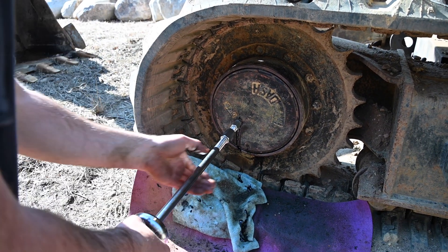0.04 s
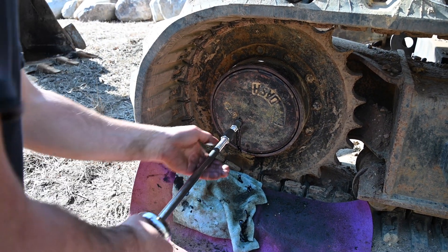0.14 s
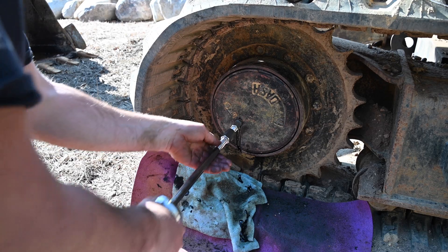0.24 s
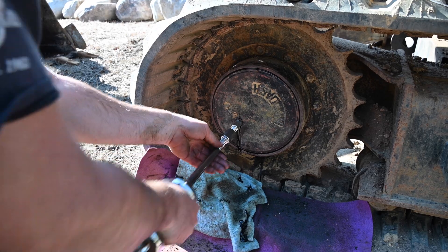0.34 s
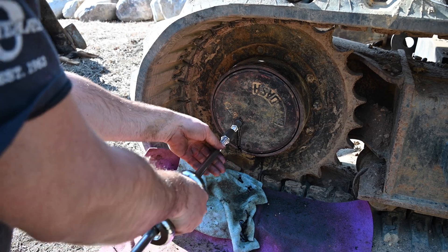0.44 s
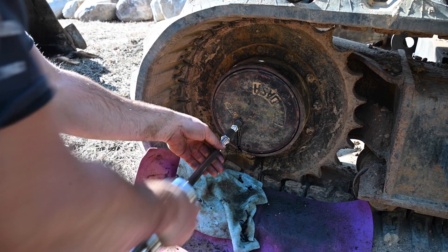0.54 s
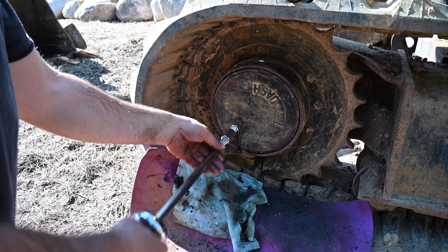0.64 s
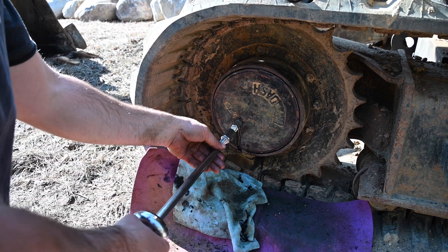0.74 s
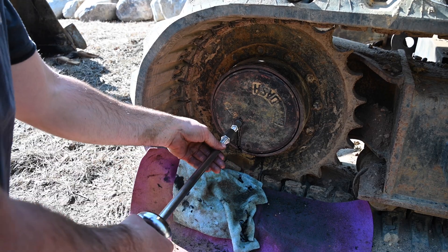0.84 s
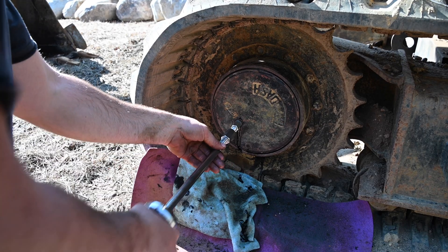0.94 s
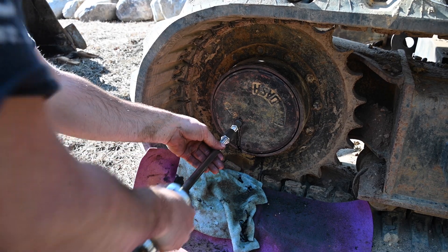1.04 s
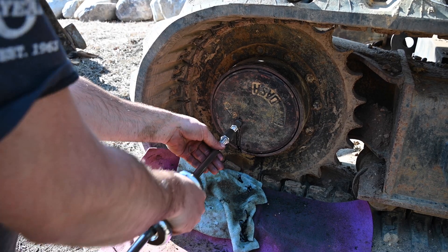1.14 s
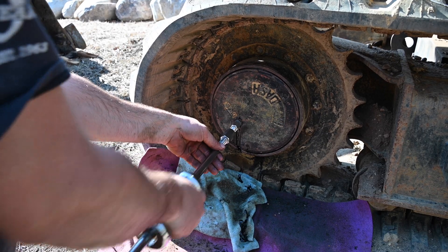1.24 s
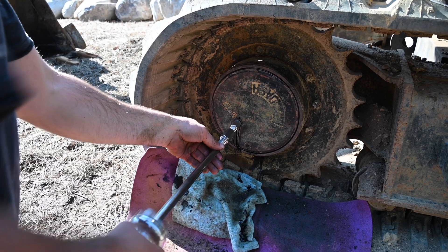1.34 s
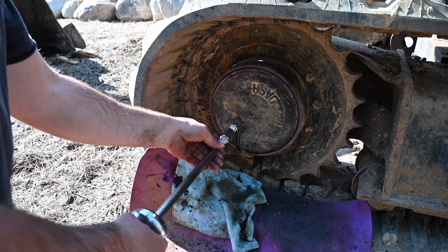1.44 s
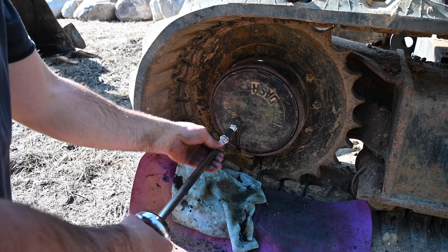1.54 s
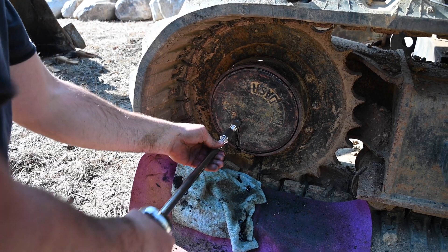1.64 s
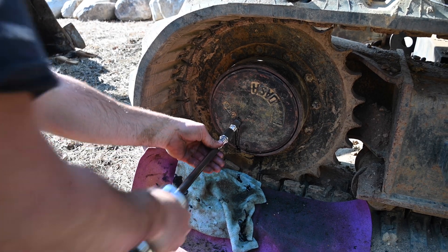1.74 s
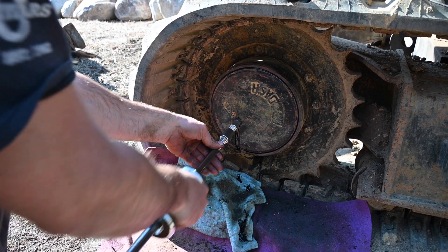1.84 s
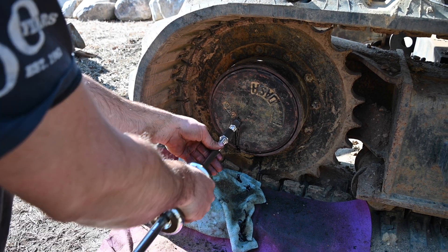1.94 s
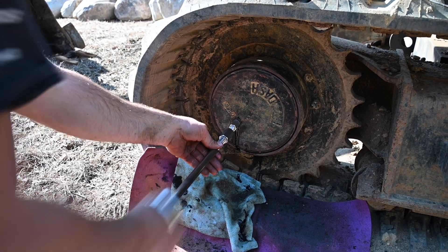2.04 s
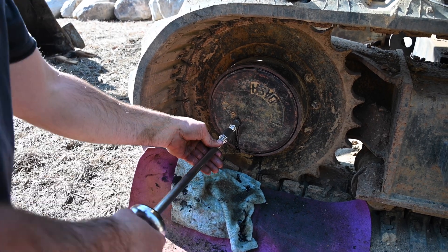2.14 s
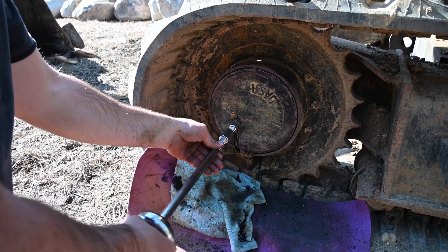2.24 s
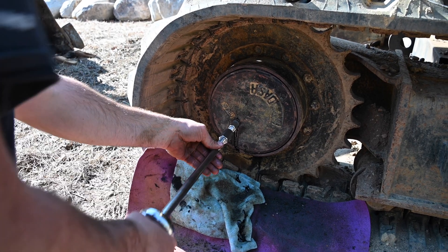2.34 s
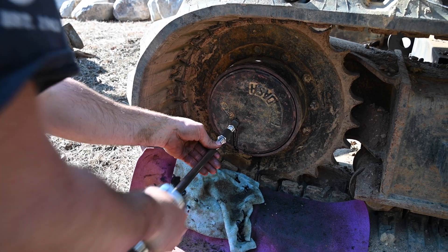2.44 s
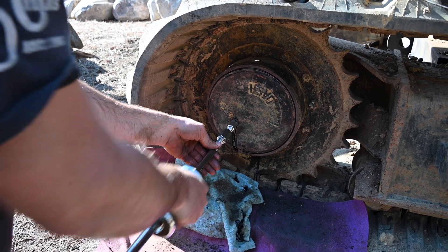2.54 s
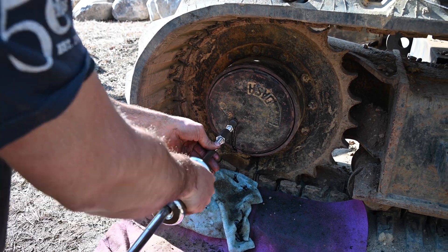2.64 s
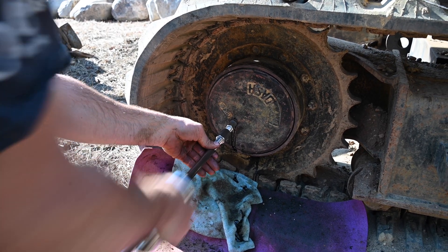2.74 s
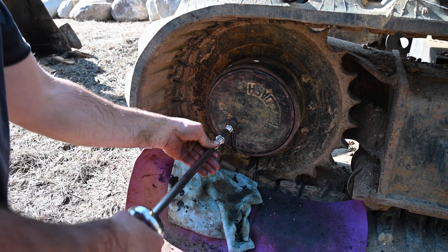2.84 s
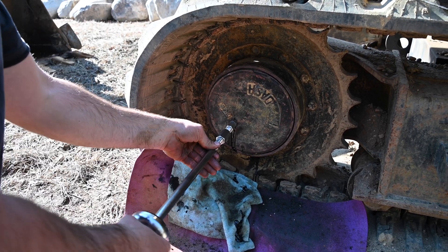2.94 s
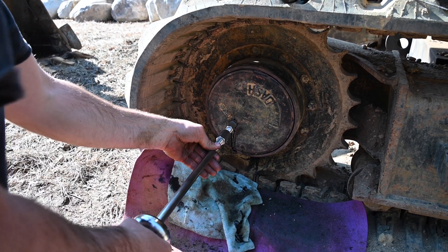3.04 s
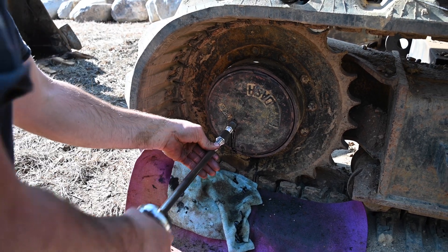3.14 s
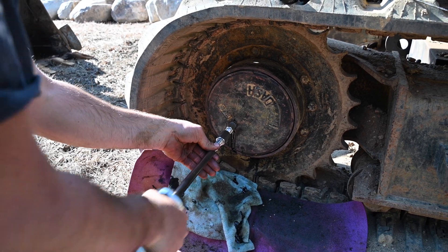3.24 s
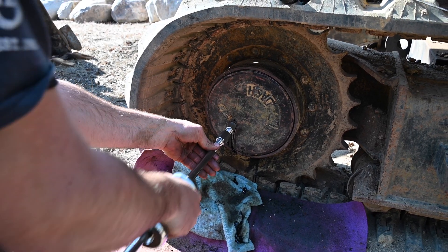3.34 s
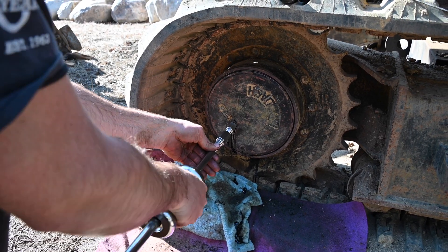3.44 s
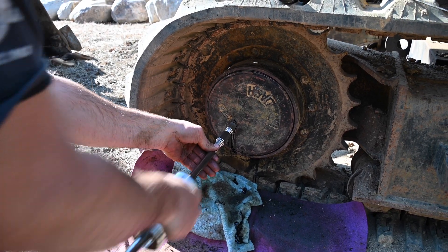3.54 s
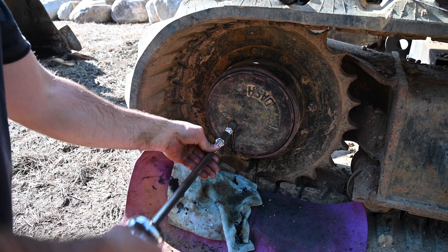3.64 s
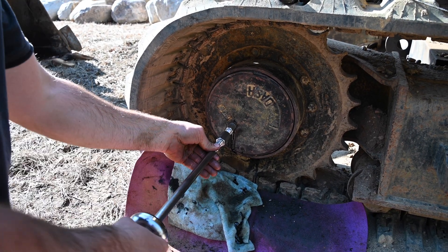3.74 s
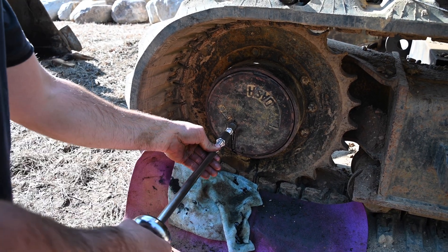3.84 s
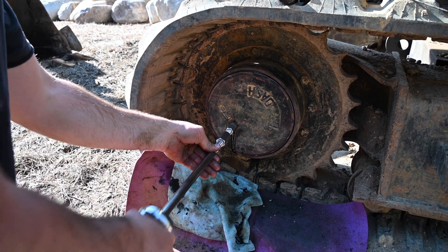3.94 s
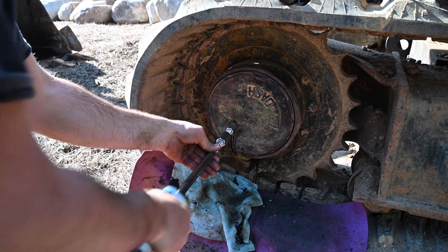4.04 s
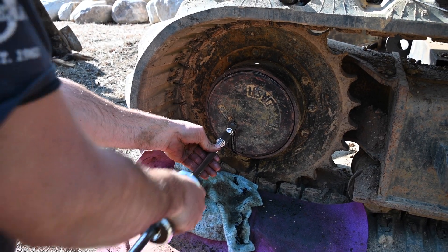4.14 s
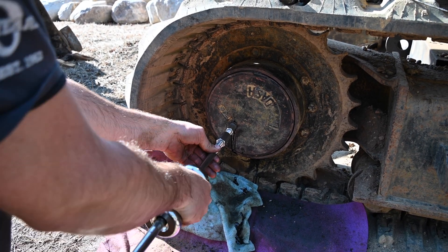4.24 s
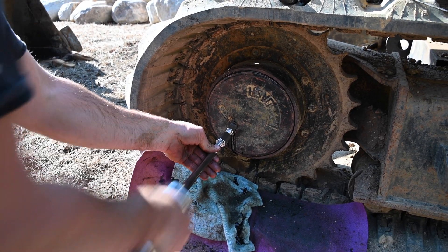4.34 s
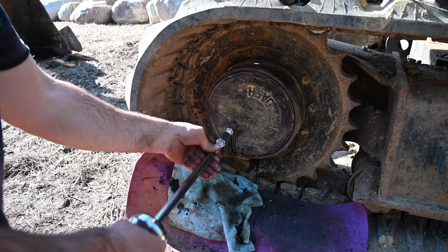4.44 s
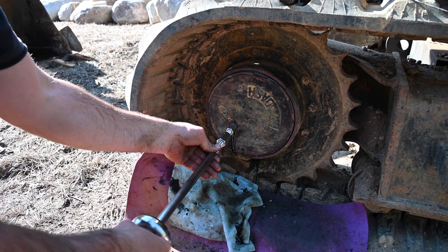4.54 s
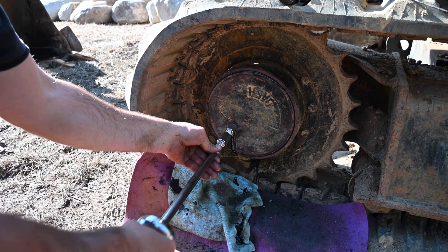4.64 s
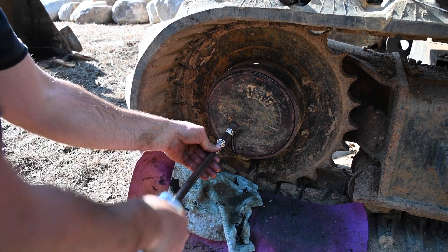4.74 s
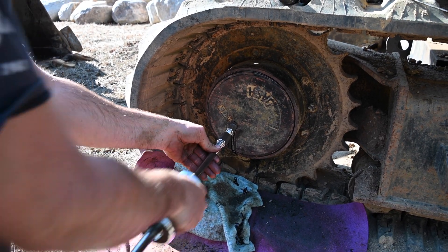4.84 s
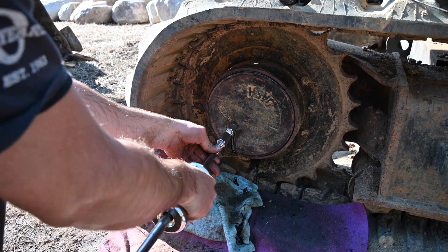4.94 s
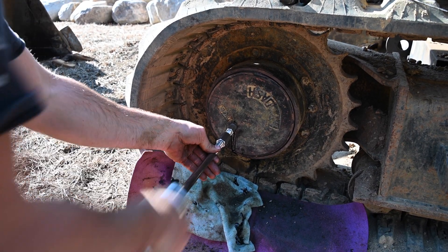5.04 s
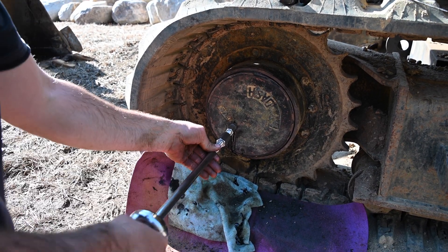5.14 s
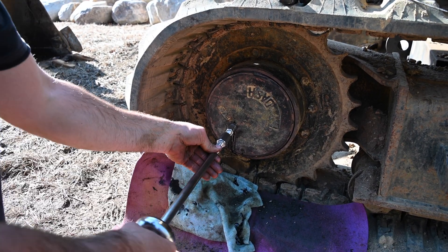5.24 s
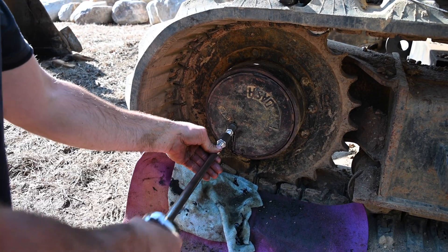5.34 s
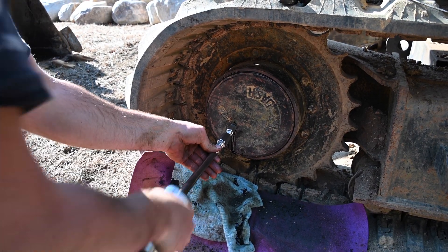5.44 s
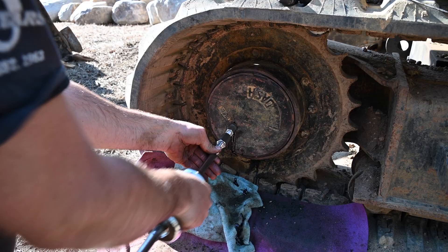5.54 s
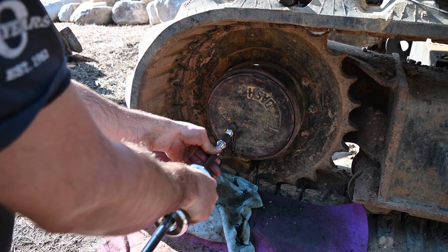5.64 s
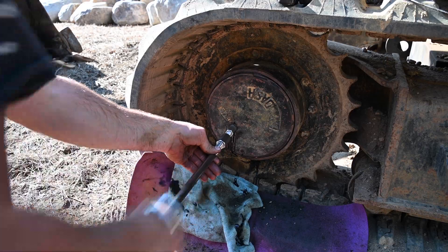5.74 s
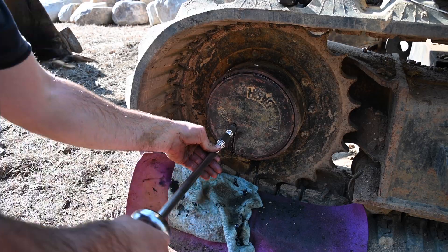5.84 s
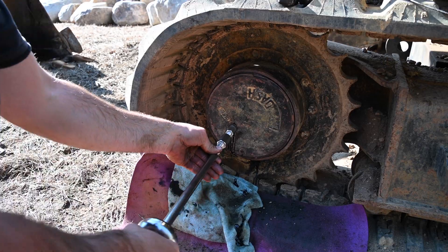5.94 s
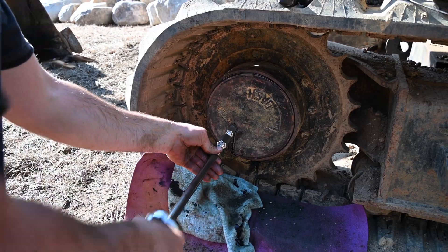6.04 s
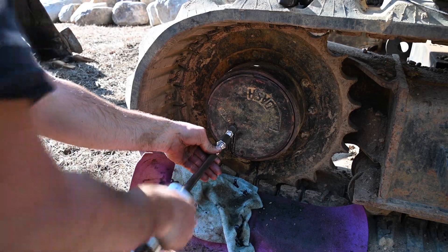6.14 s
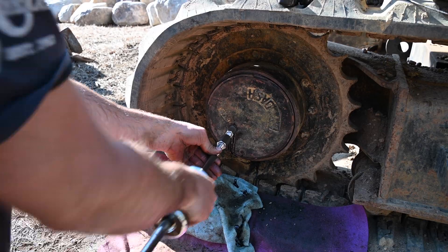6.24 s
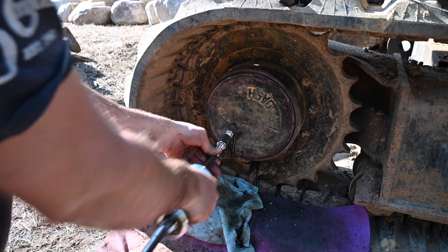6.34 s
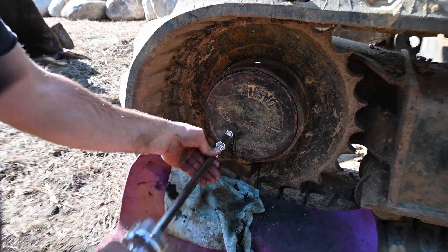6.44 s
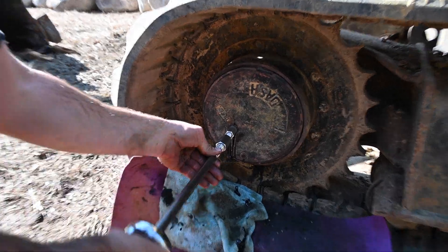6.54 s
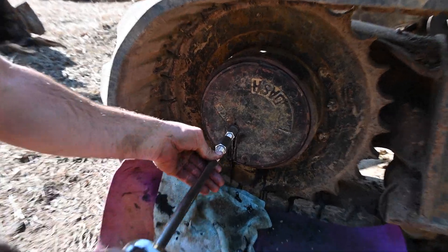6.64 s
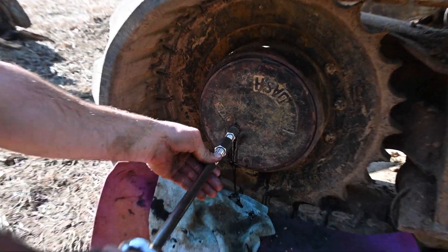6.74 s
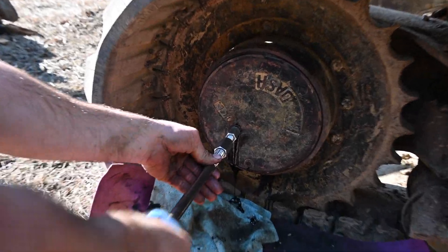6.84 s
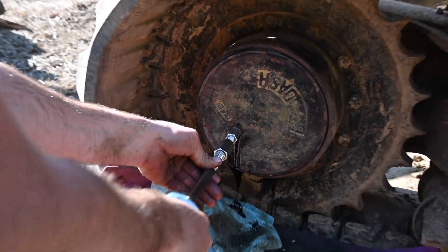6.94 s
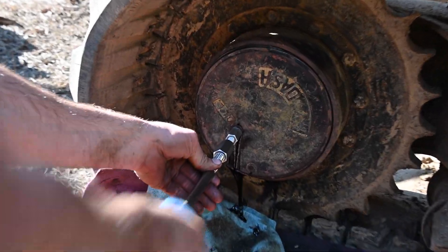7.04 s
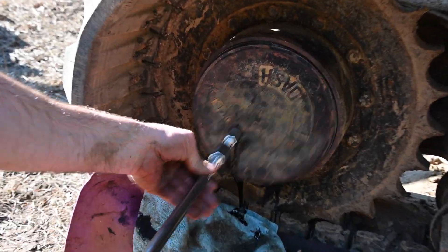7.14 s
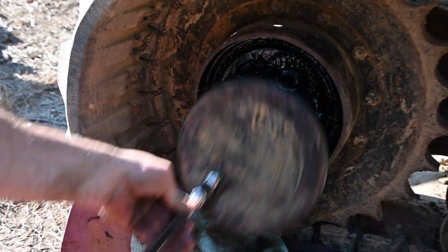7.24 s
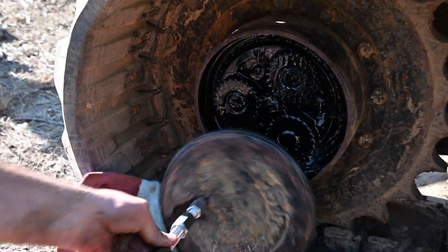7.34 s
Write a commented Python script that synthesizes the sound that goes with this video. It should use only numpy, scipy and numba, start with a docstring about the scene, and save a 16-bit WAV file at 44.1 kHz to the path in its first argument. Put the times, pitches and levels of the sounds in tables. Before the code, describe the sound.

Outdoors, over the low drone of distant machinery, a slide hammer strikes ten hard, evenly paced steel blows close by. Between them the weight rasps along its rod and rattles lightly. Puffs of wind thump the microphone early on, and a sleeve hisses across it near the middle. The final blow follows a short rising zip and frees a metal hub cover, which clangs hollowly.

```python
"""Far machinery drones outdoors and wind bumps the microphone as a steel weight scrapes along its rod.
It is a slide hammer, pulled ten times to draw a steel cover off the drive hub of a tracked machine.
The weight slides forward, clinks at the front stop and slams back into the rear one, ringing rod, cover
and hub; a limiter ducks under the blows. A sleeve brushes by midway. The last pull zips over the rod's
tool marks, and its blow knocks the cover free with a hollow clang."""
import sys
import numpy as np
from scipy import signal
from scipy.fft import rfft, irfft, next_fast_len
from scipy.io import wavfile
from scipy.ndimage import uniform_filter1d, map_coordinates
from numba import njit

SR = 44100
rng = np.random.default_rng(int(sys.argv[2]) if len(sys.argv) > 2 else 0)


def unload_audio(sound):
    """Save the sound as a 16-bit wav file, at the path given as the first command line argument."""
    columns = np.transpose(np.atleast_2d(sound))
    # keep every value between -1 and 1, then stretch to whole-number steps
    steps = np.round(np.clip(columns, -1, 1) * 32767)
    wavfile.write(sys.argv[1], SR, steps.astype(np.int16))


N = 326643

# Stereo image of close sounds and of diffuse ones: freq_hz, left_right_correlation
CLOSE_IMAGE = [(100, 1), (300, 0.99), (800, 0.87), (1500, 0.88), (4000, 0.38), (8000, 0.12), (14000, -0.45)]
DIFFUSE_IMAGE = [(130, 0.92), (300, 0.96), (640, 0.88), (1400, 0.47), (3000, 0.15), (10000, 0.11)]
# Spectrum of the far machinery: freq_hz, level_db
DRONE_SPECTRUM = [(15, -28.5), (25, 4), (101, 7), (224, 1.5), (529, -3), (790, -1), (1240, -7.5),
                  (1540, -5.5), (1670, -8.5), (3010, -11), (3540, -17.5), (3830, -15.5), (5420, -17.5),
                  (8780, -23.5), (15000, -29)]
# Its steady tones: pitch_hz, level_db
HUM_TONES = [(108, -64), (155, -56.5), (748, -62.5)]
# Resonances of the rod under the weight: pitch_hz, width_hz, level_db
ROD_MODES = [(1028, 240, -2), (1466, 126, -2.5), (1775, 48, 3.5), (2064, 360, -1.5), (2291, 128, 3),
             (2738, 160, -2.5), (3424, 130, -6), (4047, 94, 1.5), (4640, 160, -14.5), (5190, 62, 2.5),
             (5500, 140, -4), (6435, 66, -2), (8260, 180, -10.5), (10460, 140, -11.5), (12050, 230, -15)]
# Forward strokes of the weight: top_speed_s, length_s, scrape_db, sing_db
PUSH_STROKES = [(0.377, 0.24, -45.5, -62), (1.08, 0.17, -41, -45.5), (1.83, 0.23, -39, -46.5),
                (2.563, .26, -43.5, -46), (3.304, 0.21, -39.5, -66), (4.136, 0.22, -43, -60),
                (4.89, 0.23, -39.5, -61), (5.576, .28, -42, -48), (6.3, 0.31, -42, -52),
                (7.006, 0.19, -45.5, -61)]
# Puffs of wind: peak_s, length_s, level_db
WIND_PUFFS = [(0.37, 0.12, -34), (0.476, 0.023, -27.5), (1.76, 0.056, -22.5), (1.87, 0.09, -18),
              (2.01, .05, -28.5), (2.401, 0.023, -20.5), (2.485, 0.07, -31), (7.19, .08, -33)]
# Their low rumble: freq_hz, level_db
WIND_SPECTRUM = [(15, -54), (25, -17), (59, 4), (108, 3), (260, -8.5), (487, -27.5), (700, -38), (910, -73),
                 (1540, -120)]
# Light contacts of weight and rod: start_s, level_db, body_db, treble_db
CLINK_HITS = [(0.599, -15.5, -6.5, 0), (0.638, -26, 13.5, 5), (0.68, -22, -10, 5), (1.401, -19.5, -1, -8),
              (2.158, -9, -13, 9), (2.547, -24.5, -9, -15), (2.691, -20, -4, -21), (2.768, -2.5, -26, 4),
              (2.88, -8, -9, 11), (3.269, -24, 0, 20), (3.342, -18.5, -3, -2), (3.353, -21.5, -15, -7),
              (3.718, -16, -10, 4), (4.169, -30, 26, -12), (4.456, -25, 4, 10), (4.483, -15, 2, 4),
              (4.997, -23, 6.5, -11), (5.05, -9, -15.5, -1.5), (5.064, -17.5, -2.5, -1),
              (5.576, -9.5, -5, -7), (5.727, -8.5, -20.5, 8), (6.427, -21, -1, -15), (6.521, -17, -4, 3),
              (6.771, -11, -5.5, 11.5), (6.912, -18.5, -2, 11), (7.219, -15, 5, 3)]
# The tick of such a contact: freq_hz, level_db
CLINK_SPECTRUM = [(150, -38), (250, 0), (1200, -5), (1470, 7), (1980, -34), (2320, -1.5), (4410, -3.5),
                  (5350, -2), (5930, -10), (6590, -10.5), (16000, -35.5)]
# Blows on the rear stop and the pull into each: start_s, level_db, thump_db, clang_db, pull_s, scrape_db
BLOW_HITS = [(0.719, -0.5, -0.5, 1.5, .12, -32), (1.447, -0.5, 1.5, -7, 0.1, -31.5),
             (2.170, -3.5, 0.5, -0.5, 0.098, -27.5), (2.896, -5.5, 2.5, -1, 0.082, -32.5),
             (3.726, -2.5, -2.5, 0.5, 0.13, -27.5), (4.498, -6.5, -3.5, 3, .15, -28),
             (5.187, -7, -1, 2.5, 0.12, -27.5), (5.873, -8, 2, 4, 0.086, -27.5),
             (6.552, -1, 4.5, 4.5, .17, -28), (7.234, -2.5, -3, 5.5, .13, -26.5)]
# The noisy crash of a blow: freq_hz, level_db
CRASH_SPECTRUM = [(35, -28), (60, -15.5), (268, 2.5), (579, -14.5), (785, -2), (1220, -9.5), (1820, -4),
                  (2250, -16), (2580, -1.5), (3270, -9), (5330, -5), (6000, -11), (10800, -12.5),
                  (16000, -16.5)]
# Rod, cover and hub ringing together: pitch_hz, level_db, t60_s
STEEL_MODES = [(242, -10, 0.034), (288.5, -3, 0.098), (724.5, -0.5, 0.067), (812, -1.5, 0.088),
               (1009, -1.5, 0.045), (1270, -11, 0.05), (1495, -5, 0.084), (1593, -8, 0.086),
               (1785, 2, 0.063), (2033, -6.5, 0.089), (2460, -10, 0.087), (2670, -6.5, 0.079),
               (3680, -12, 0.06), (4324, -1, 0.037), (4440, -6, 0.074), (4907, -1, 0.048), (5380, 7, 0.034),
               (8200, -4, 0.068), (10600, -2.5, 0.082)]
# Hiss of brushing cloth: freq_hz, level_db
CLOTH_SPECTRUM = [(500, -31), (1500, -5), (3500, -1.5), (4500, -6.5), (7000, 0.5), (9000, -3), (11000, -1),
                  (15500, -11)]
# The cover knocks in its seat and comes free: start_s, level_db, hollow_db
COVER_KNOCKS = [(6.914, -15, -3), (7.243, 1, 9), (7.251, -5, 4), (7.266, -4, 0.5)]
# Ring of the loose cover: pitch_hz, level_db, t60_s
COVER_MODES = [(394, -4.5, 0.15), (755, -7, 0.1), (1007, -5.5, 0.1), (1480, 1.5, 0.093), (1760, -5, 0.085),
               (5210, 15, 0.028), (7100, -6, 0.087)]
# The zip of the last pull: peak_s, length_s, level_db
ZIP_SWELL = [(7.19, 0.12, -35)]
# The hammer's balance at the two microphone ports: freq_hz, left_minus_right_db
HAMMER_PAN = [(150, 4), (400, -1.5), (700, 3.5), (1300, -1), (2300, -4), (4400, -1), (8000, 1), (15000, .5)]
# Decay of the yard's tail: freq_hz, t60_s
YARD_DECAY = [(150, 0.31), (1500, 0.53), (5000, 0.52), (14000, 0.5)]
# Colour of that tail: freq_hz, gain_db
YARD_EQ = [(100, 11), (300, 14.5), (1000, 0.5), (3000, 6.5), (12000, -2.5)]


def amp(db):
    """Decibels to gain."""
    return 10 ** (np.asarray(db) / 20)


def unit(x):
    """Scale to an rms of 1."""
    return x / np.sqrt(np.mean(x ** 2) + 1e-20)


def along(points, hz):
    """Read (freq_hz, value) points on a log frequency axis."""
    freqs, values = np.transpose(points)
    return np.interp(np.log(hz + 1), np.log(freqs + 1), values)


def eq(points):
    """An EQ curve, gain by frequency, through (freq_hz, level_db) points."""
    return lambda hz: amp(along(points, hz))


def wobble(rate_hz):
    """A smooth random drift with rate_hz knots a second."""
    knots = rng.standard_normal(int(N * rate_hz / SR) + 4)
    return map_coordinates(knots, [np.arange(N) * rate_hz / SR])


def filtered(x, response):
    """Play x through a frequency response."""
    n = x.shape[-1]
    padded = next_fast_len(n + n // 8)
    return irfft(rfft(x, padded) * response(np.fft.rfftfreq(padded, 1 / SR)), padded)[..., :n]


def noise(colour, image, size=N):
    """Stereo noise of rms 1 with a given colour and stereo image."""
    def mid_side(hz):
        angle = np.arccos(np.clip(along(image, hz), -1, 1)) / 2
        return colour(hz) * np.array([np.cos(angle), np.sin(angle)])
    mid, side = filtered(rng.standard_normal((2, size)), mid_side)
    return unit(np.array([mid + side, mid - side]))


def swells(rows, rise, power=1.94):
    """Envelope of (peak_s, length_s, level_db) swells, 10 dB down at each end; rise is a share of each."""
    t, gain = np.arange(N) / SR, np.zeros(N)
    for peak_s, length_s, db in rows:
        away = np.abs(t - peak_s) / (length_s * np.where(t < peak_s, rise, 1 - rise))
        gain += amp(db - 10 * np.minimum(away ** power, 10))
    return gain


def shimmer(x, depth_db):
    """Each band swells and sinks on its own within a few hundredths of a second."""
    bands = signal.stft(x, nperseg=512)[2]
    drift = uniform_filter1d(rng.standard_normal(bands.shape[1:]), size=4, axis=0)
    drift = uniform_filter1d(drift, size=7, axis=1)
    return signal.istft(bands * amp(depth_db * unit(drift)), nperseg=512)[1][:, :N]


def add(track, start_s, sound):
    """Mix a sound into a track."""
    part = track[:, round(start_s * SR):][:, :sound.shape[1]]
    part += sound[:, :part.shape[1]]


def drone_and_whine(drone_db=-39, whine_db=-55, whine_hz=15704):
    """The bed: far machinery drones and hums, and the microphone's electronics whine faintly."""
    t = np.arange(N) / SR
    drone = amp(drone_db + 1.66 * wobble(9.4)) * noise(eq(DRONE_SPECTRUM), DIFFUSE_IMAGE)
    hum = sum(amp(db + 2.3 * wobble(3.7)) * np.sin(2 * np.pi * hz * t + 1.2 * wobble(17))
              for hz, db in HUM_TONES)
    whine = amp(whine_db + 1.2 * wobble(3)) * np.sin(2 * np.pi * whine_hz * t) * amp([[-1.5], [1.5]])
    return drone + np.sqrt(2) * (hum + whine)


def rod_response(hz):
    """The rod as a bank of resonators of alternating polarity."""
    return sum((-1) ** k * amp(db) * 1j * hz * width / (pitch ** 2 - hz ** 2 + 1j * hz * width)
               for k, (pitch, width, db) in enumerate(ROD_MODES))


def rod_scrape(grain_db=4, chatter_db=3, grit_per_s=130, grit_db=-4, reflection=0.48):
    """Roughness and grit excite the rod; waves reflected at the moving weight sweep its colour."""
    rough = unit(amp(grain_db * wobble(1100) + chatter_db * wobble(70)))
    grit = unit((rng.random(N) < grit_per_s / SR) * 1.)
    friction = (rough + amp(grit_db) * grit) * noise(eq([(1000, 0.5), (10000, -2)]), CLOSE_IMAGE)
    direct = shimmer(filtered(friction, rod_response), depth_db=5)
    n = np.arange(N)
    stroke_edges = np.r_[0, np.transpose(BLOW_HITS)[0]] * SR
    strokes = np.interp(n, stroke_edges, np.arange(len(stroke_edges)))
    position = np.sin(np.pi * strokes) ** 2  # 0 at the rear stop, 1 at the front
    delay_s = 0.000507 + 0.000724 * position
    reflected = np.array([np.interp(n - delay_s * SR, n, side) for side in direct])
    return unit(direct + reflection * reflected)


def pushes(scrape, push_db=2, unsteady_db=2, sing_db=-3, sing_hz=1794, width_hz=24, sing_s=0.47):
    """The weight slides forward, speeds up and coasts; the rod's bending note sings a little longer."""
    glide = swells([row[:3] for row in PUSH_STROKES], rise=0.36, power=2.04)
    slide = amp(push_db + unsteady_db * wobble(35)) * glide * scrape
    note = noise(lambda hz: 1 / (1 + ((hz - sing_hz) / width_hz) ** 2), CLOSE_IMAGE)
    sustain = swells([(peak_s, sing_s, db) for peak_s, _, _, db in PUSH_STROKES], rise=0.15)
    return slide + amp(sing_db) * note * sustain


def wind(buffet_db=-2, lumpy_db=3):
    """Lumps of moving air bump the microphone ports, mostly the left one."""
    gusts = swells(WIND_PUFFS, rise=0.46) * amp(buffet_db + lumpy_db * wobble(200))
    return gusts * noise(eq(WIND_SPECTRUM), image=[(100, 0.067)]) * amp([[3], [-5]])


def ring(t, modes, tint, scatter_db, detune, spread_hz=5000):
    """Struck steel rings in decaying modes, varied per hit; short waves reach the ports out of step."""
    hz, db, t60_s = np.transpose(modes)[:, :, None]
    strength, skew, shift = rng.standard_normal((3, len(modes), 1))
    envelope = tint(hz) * amp(db + scatter_db * strength - 60 * t / t60_s)
    phase = 2 * np.pi * hz * (1 + detune * shift) * t + rng.uniform(0, 2 * np.pi, hz.shape)
    offset = skew * hz / spread_hz
    return np.array([np.sum(envelope * np.sin(phase + port * offset), 0) for port in (-1, 1)])


def clink(t, db, body_db, treble_db, t60_s, ring_db, snap_t60_s=0.0077):
    """A light contact ticks and rings the rod, tuned a little differently each time."""
    tint = eq([(700, body_db), (4000, 0), (9000, treble_db)])
    decay = amp(-60 * t / t60_s) + amp(-60 * t / snap_t60_s)
    tick = noise(lambda hz: eq(CLINK_SPECTRUM)(hz) * tint(hz), CLOSE_IMAGE, len(t)) * decay
    modes = [(hz, mode_db, 0.06 * (2000 / hz) ** 0.36) for hz, _, mode_db in ROD_MODES]
    tone = amp(ring_db) * ring(t, modes, tint, scatter_db=3.5, detune=0.0302)
    attack_s = 0.00093 * amp(-27 - db)  # a glancing touch starts softly
    return amp(db) * (tick + tone) * (1 - np.exp(-t / attack_s))


def clinks(gain_db=-10):
    """The weight rattles on the rod and meets the front stop."""
    out, t = np.zeros((2, N)), np.arange(SR // 6) / SR
    for start_s, db, body_db, treble_db in CLINK_HITS:
        add(out, start_s, amp(gain_db) * clink(t, db, body_db, treble_db, t60_s=0.053, ring_db=-3))
    return out


def pulls(scrape, hiss_db=-5, speed_power=1.85):
    """The weight is yanked back, gaining speed steadily: its scrape swells and stops dead at the blow."""
    t, envelope = np.arange(N) / SR, np.zeros(N)
    for blow_s, *_, pull_s, scrape_db in BLOW_HITS:
        speed = (t < blow_s) * np.clip(1 - (blow_s - t) / pull_s, 0, 1)
        envelope += amp(scrape_db) * speed ** speed_power
    hiss_colour = eq([(300, -7), (1200, -1.5), (2300, -7), (3300, -1),
                      (4300, 0), (5500, 0), (7500, -6.5), (15000, -13)])
    return envelope * (scrape + amp(hiss_db) * noise(hiss_colour, CLOSE_IMAGE))


def blows(gain_db=11, ring_db=-13, crack_db=-6, crack_t60_s=0.0077, bloom_s=0.0029, contact_s=0.0053):
    """Steel on steel: a crack, then the shock runs up the rod and sets cover and hub crashing."""
    out, t = np.zeros((2, N)), np.arange(SR // 5) / SR
    crack_colour = eq([(500, 0), (4000, -18), (10000, 13), (15000, 4.5)])
    for count, (start_s, db, thump_db, clang_db, _, _) in enumerate(BLOW_HITS):
        t60_s = 0.032 + 0.0026 * count  # the crash lengthens as the cover works loose
        tint = eq([(300, thump_db), (500, 0), (900, clang_db), (2000, 0)])
        crash = noise(lambda hz: eq(CRASH_SPECTRUM)(hz) * tint(hz), CLOSE_IMAGE, len(t))
        crash *= amp(-60 * np.maximum(t - contact_s, 0) / t60_s)
        crack = noise(crack_colour, CLOSE_IMAGE, len(t)) * amp(crack_db - 60 * t / crack_t60_s)
        tone = amp(ring_db) * ring(t, STEEL_MODES, tint, scatter_db=2, detune=0.0072)
        body = (crash + tone) * (1 - np.exp(-t / bloom_s))
        add(out, start_s, amp(db + gain_db) * (crack + body))
    return out


def sleeve(start_s=2.893, attack_s=0.023, hold_s=0.48, fade_db_per_s=75, cloth_db=-39, crackle_db=2):
    """Cloth brushes the microphone with a wide, crackly hiss: it touches, holds and slides off."""
    age = np.maximum(np.arange(N) / SR - start_s, 0)
    touch = (1 - np.exp(-age / attack_s)) * amp(-fade_db_per_s * np.maximum(age - hold_s, 0))
    crackle = amp(cloth_db + wobble(60) + crackle_db * wobble(900))
    return crackle * touch * noise(eq(CLOTH_SPECTRUM), DIFFUSE_IMAGE) * amp([[-0.7], [0.7]])


def loose_cover(scuff_db=-6, ring_db=-9, attack_s=0.0009):
    """The loose cover scuffs its seat and rings on its own, hollower as it leaves the hub."""
    out, t = np.zeros((2, N)), np.arange(SR // 5) / SR
    for start_s, db, hollow_db in COVER_KNOCKS:
        scuff = amp(scuff_db) * clink(t, db, 6.5 + hollow_db, treble_db=14, t60_s=0.08, ring_db=-14)
        hollow = eq([(400, 0), (750, hollow_db), (1050, hollow_db), (1450, 0)])
        tone = amp(db + ring_db) * ring(t, COVER_MODES, hollow, scatter_db=0, detune=0.003)
        add(out, start_s, scuff + tone * (1 - np.exp(-t / attack_s)))
    return out


def tool_mark_zip(pitch_hz=4100, octaves_per_s=10, roughness=0.051, flutter_db=3):
    """Tool marks pass ever faster under the weight and give a rough, rising note."""
    from_peak_s = np.arange(N) / SR - ZIP_SWELL[0][0]
    octaves = np.clip(octaves_per_s * from_peak_s, -1, 1)
    hz = pitch_hz * 2 ** octaves * (1 + roughness * wobble(1500))
    note = np.sin(2 * np.pi * np.cumsum(hz) / SR)
    return swells(ZIP_SWELL, rise=0.43) * amp(flutter_db * wobble(390)) * note


def yard_tail(x):
    """The machine's flank and the ground send back a thin tail."""
    hz, t, bands = signal.stft(rng.standard_normal((2, SR // 2)), SR, nperseg=256)
    decay = amp(-60 * t / along(YARD_DECAY, hz)[:, None])
    impulse = signal.istft(bands * decay, SR, nperseg=256)[1]
    tail = signal.fftconvolve(x, impulse / np.linalg.norm(impulse[0]), axes=1)[:, :N]
    return filtered(tail, eq(YARD_EQ))


def scene(yard_db=-31):
    """The mix: the hammer up close with its tail, wind and cloth on the microphone, the bed behind."""
    scrape = rod_scrape()
    hammer = blows() + clinks() + loose_cover() + pushes(scrape) + pulls(scrape) + tool_mark_zip()
    hammer = filtered(hammer, lambda hz: amp(np.outer([0.5, -0.5], along(HAMMER_PAN, hz))))
    return hammer + amp(yard_db) * yard_tail(hammer) + wind() + sleeve() + drone_and_whine()


@njit
def ducking(excess_db, cut_db, attack_s, hold_s, release_s):
    """The limiter's gain reduction in dB, starting at cut_db: it grabs, holds, then lets go."""
    out, wait = np.zeros(len(excess_db)), hold_s * SR
    for i in range(len(excess_db)):
        if excess_db[i] > cut_db:
            cut_db += (excess_db[i] - cut_db) / (attack_s * SR)
            wait = hold_s * SR
        elif wait > 0:
            wait -= 1
        else:
            cut_db -= cut_db / (release_s * SR)
        out[i] = cut_db
    return out


def record(dry, threshold_db=-5, full_scale=0.9, top_hz=16300):
    """A limiter starts ducked and dips under the blows; overshoots are sheared, the very top is cut."""
    excess_db = 20 * np.log10(np.abs(dry).max(0) + 1e-9) - threshold_db
    cut_db = ducking(excess_db, cut_db=12.0, attack_s=0.00019, hold_s=0.071, release_s=0.09)
    limited = np.clip(dry * amp(-cut_db), -full_scale, full_scale)
    return filtered(limited, lambda hz: hz < top_hz)


dry = scene()
out = record(dry)
unload_audio(out)
```